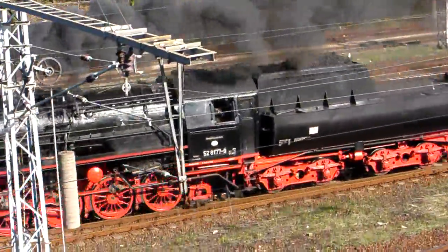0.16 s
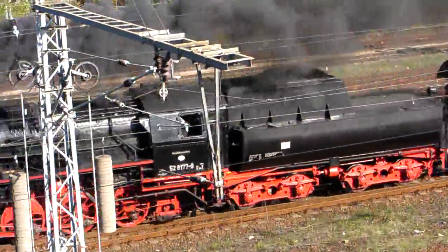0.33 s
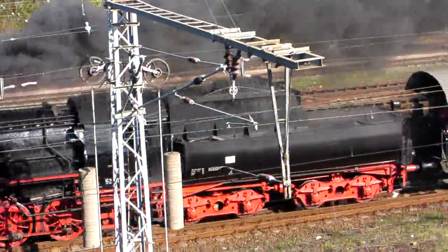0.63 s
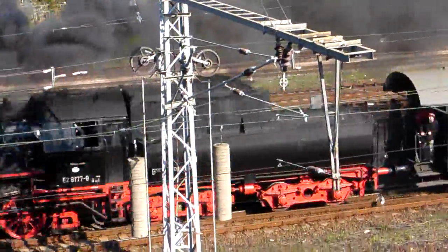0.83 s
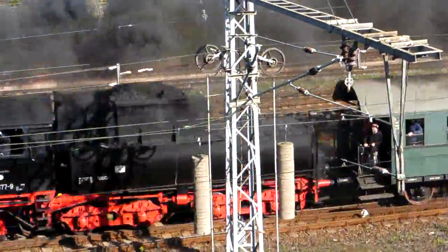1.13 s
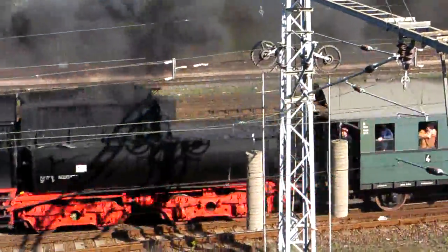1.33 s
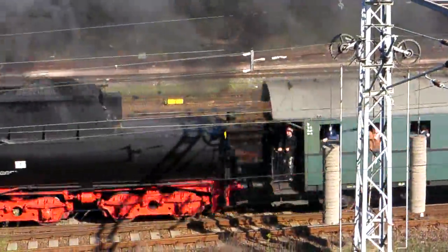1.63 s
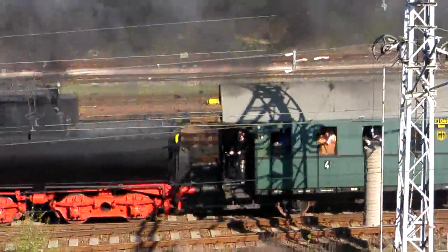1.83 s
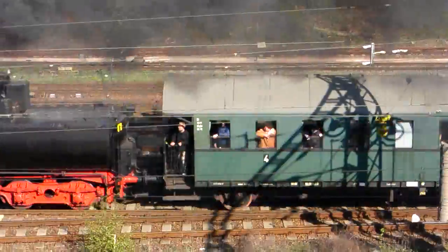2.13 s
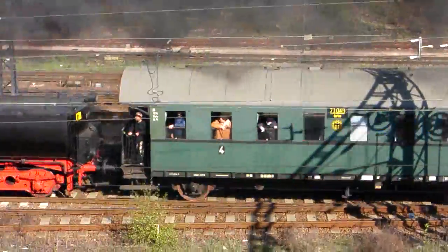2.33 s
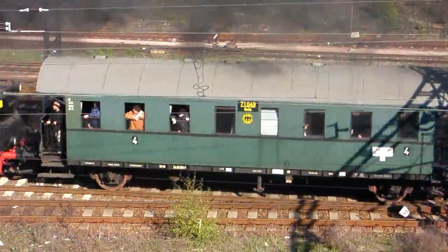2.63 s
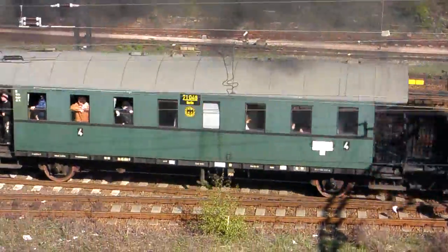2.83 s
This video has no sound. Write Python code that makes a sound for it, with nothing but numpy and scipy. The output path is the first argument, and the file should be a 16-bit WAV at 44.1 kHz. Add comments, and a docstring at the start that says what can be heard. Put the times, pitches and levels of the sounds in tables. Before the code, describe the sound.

Close pass of a steam locomotive and coaches: steady rushing roar, wheel thuds, steel clanks, thinning steam

```python
"""A steam train rolls past just below microphones on a bridge, already close as the sound begins.
Wheels rumble and thud over rail joints, and the running gear and exhaust roar in beats and pops: shaped noise
and damped sines. Rods and couplings clank as noise bursts with beating partials, over fainter clatter.
Leaking steam, a bright noise, spits once early on, leans to the left and fades as the engine draws away.
The microphones drop the deep bass and have a notch near 8 kHz."""
import sys
import numpy as np
from scipy import signal
from scipy.fft import rfft, irfft, next_fast_len
from scipy.io import wavfile
from scipy.ndimage import uniform_filter1d, map_coordinates

SR = 44100
rng = np.random.default_rng(int(sys.argv[2]) if len(sys.argv) > 2 else 0)


def volts_from_db(level):
    """Convert decibel levels to linear amplitude ratios."""
    exponent = np.asarray(level, float) / 20
    return 10 ** exponent


def digitize_waveform(pressure):
    """Quantize a signal to 16-bit integers and store it at the path in sys.argv[1].

    Rows of a 2-D input are taken as channels; values are limited to [-1, 1].
    """
    field = np.atleast_2d(pressure).T
    bounded = np.clip(field, -1, 1)
    quanta = np.round(bounded * 32767).astype(np.int16)
    wavfile.write(sys.argv[1], SR, quanta)


N = 130977
T = np.arange(N) / SR  # seconds


def unit(x):
    """Scaled to rms 1."""
    return x / np.sqrt(np.mean(x ** 2) + 1e-20)


def along(points, hz):
    """(Hz, value) points joined on a log frequency axis."""
    point_hz, value = np.transpose(points)
    return np.interp(np.log(hz + 1), np.log(point_hz + 1), value)


def curves(rows):
    """One value per sample for each column after the time."""
    s, *columns = np.transpose(rows)
    return [np.interp(T, s, column) for column in columns]


def wobble(knots_per_s):
    """A smooth random curve through normally distributed knots."""
    return map_coordinates(rng.standard_normal(400), [T * knots_per_s])


def swells(rows, width_s):
    """The sum of bell-shaped envelopes, one for each (s, dB) row."""
    return sum(volts_from_db(db) * np.exp(-.5 * ((T - s) / width_s) ** 2) for s, db in rows)


def filtered(x, response):
    """x times a response of frequency."""
    m = next_fast_len(N + SR // 2)
    return irfft(rfft(x, m) * response(np.fft.rfftfreq(m, 1 / SR)), m)[..., :N]


def coloured(colour):
    """Mono noise of rms 1 with the given spectrum."""
    return unit(filtered(rng.standard_normal(N), lambda hz: volts_from_db(along(colour, hz))))


# How alike a wide source is at the two microphones. Each row: frequency in Hz, left-right likeness from 0 to 1.
ALIKE = [(60, 1), (300, 1), (1000, 0.99), (2000, 0.94), (4000, 0.81), (7000, 0.36), (10000, 0.56),
         (12400, 0.77)]


def rush(colour, patchy_db, apart=1):
    """Stereo noise, its middle at rms 1, with patches of random gain in time and frequency."""
    spectrum = signal.stft(rng.standard_normal((2, N)), nperseg=512)[2]
    field = rng.standard_normal(spectrum.shape[1:])
    field = uniform_filter1d(uniform_filter1d(field, size=2, axis=0), size=5, axis=1)
    pair = signal.istft(spectrum * volts_from_db(patchy_db * unit(field)), nperseg=512)[1][:, :N]

    def mid_side(hz):
        angle = apart * np.arccos(np.clip(along(ALIKE, hz), -1, 1)) / 2
        return volts_from_db(along(colour, hz)) * [np.cos(angle), np.sin(angle)]

    mid, side = filtered(pair, mid_side)
    return np.array([mid + side, mid - side]) / np.std(mid)


# Wheels rumbling on the rails. Each row: time in seconds, level in dB.
ROLL = [(0, -29), (.12, -23), (.85, -22), (1.05, -21.5), (1.5, -21), (1.7, -21), (2.0, -22.5), (2.4, -21.5),
        (2.97, -19.5)]
# Spectrum of the rumble ahead of the microphones. Each row: frequency in Hz, relative density in dB per Hz.
ROLL_COLOUR = [(20, -52), (55, -27), (80, -16), (115, 1.5), (140, -4.5), (180, 0.5), (250, -0.5),
               (330, -6.5), (450, -16.5), (800, -47)]
# Wheel thuds over rail joints. Each row: centre in seconds, level in dB.
THUDS = [(.38, -22), (.66, -28), (.92, -28), (1.09, -24.5), (1.23, -26), (1.4, -17.5), (1.5, -32),
         (1.76, -25), (1.96, -27.5), (2.09, -25), (2.25, -25), (2.42, -30), (2.7, -23.5), (2.9, -27)]
# Spectrum of the thuds. Each row: frequency in Hz, relative density in dB per Hz.
THUD_COLOUR = [(30, -40), (65, -9), (110, 5.5), (170, 6), (260, -6.5), (450, -37.5)]


def wheels():
    """Low noise for the rumble of wheels and rails, with soft swells of bass noise at the joints."""
    level_db, = curves(ROLL)
    rumble = volts_from_db(level_db + 0.69 * wobble(18.0)) * rush(ROLL_COLOUR, patchy_db=0.3)
    thuds = swells(THUDS, width_s=0.024) * rush(THUD_COLOUR, patchy_db=2.5)
    return rumble + thuds


# Steady roar passing underneath. Each row: time in seconds, level in dB.
ROAR = [(0, -22), (.3, -21), (.9, -20), (1.25, -21.5), (1.6, -19.5), (1.85, -21.5), (2.1, -21), (2.5, -21),
        (2.97, -20.5)]
# Spectrum of the roar ahead of the microphones. Each row: frequency in Hz, relative density in dB per Hz.
ROAR_COLOUR = [(150, -28), (310, -3), (410, -6), (550, 0), (800, -1), (1200, -4), (2000, -6.5),
               (3000, -11.5), (3600, -12), (5000, -19), (7000, -25.5), (10000, -32.5), (12500, -44)]
# Exhaust beats. Each row: centre in seconds, level in dB, swell width in seconds.
CHUFFS = [(.13, -25, 0.016), (.23, -23, 0.025), (.3, -18.5, 0.025), (.44, -27.5, 0.019), (.53, -24, 0.018),
          (.63, -23.5, 0.018), (.75, -22, 0.017), (.85, -25, 0.018), (.905, -21, 0.02), (1.02, -28, 0.016),
          (1.16, -21.5, 0.033), (1.29, -31, 0.014), (1.415, -23, 0.012), (1.49, -23, 0.015),
          (1.58, -28, 0.011), (1.72, -23.5, 0.017), (2.01, -23.5, 0.019), (2.14, -26, 0.018),
          (2.19, -23.5, 0.029), (2.235, -26, 0.013), (2.42, -25, 0.023), (2.5, -24.5, 0.022),
          (2.6, -35, 0.039), (2.72, -31, 0.029), (2.81, -32, 0.038), (2.9, -27, 0.025)]
# Spectrum of the beats. Each row: frequency in Hz, relative density in dB per Hz.
CHUFF_COLOUR = [(250, -41), (500, 0), (850, 2.5), (1300, -3), (2200, -8), (4000, -19.5), (7000, -33)]


def roar():
    """Broad noise of running gear and draught, with rough exhaust beats and dull pops."""
    level_db, = curves(ROAR)
    steady = volts_from_db(level_db + 0.76 * wobble(22.07)) * rush(ROAR_COLOUR, patchy_db=1.35)
    beats = sum(swells([(s, db)], width_s) for s, db, width_s in CHUFFS)
    rough_beats = beats * volts_from_db(1.5 * wobble(80))
    return steady + rough_beats * rush(CHUFF_COLOUR, patchy_db=1.9) + pops()


# Dull pops inside the roar. Each row: start in seconds, level in dB before a common trim, pitch in Hz.
POPS = [(0.211, -15, 842), (0.304, -7, 580), (0.409, -11, 646), (0.434, 0, 840), (0.627, -8, 514),
        (0.741, -12, 845), (0.835, -13, 576), (0.967, 0, 824), (1.146, -4, 824), (1.389, -7, 713),
        (1.409, -8, 692), (1.49, -2.5, 615), (1.575, -6, 444), (2.015, -3, 795), (2.082, -8, 680),
        (2.137, -15, 923), (2.228, -10, 700), (2.623, -4, 861), (2.68, -1.5, 700), (2.828, -3, 740),
        (2.867, -6, 490), (2.898, -13, 627)]
POP_CYCLES, POP_TRIM_DB = 2.9, -2  # cycles to fall 20 dB; trim of all pops


def pops():
    """Sines so heavily damped that each lasts only a few cycles."""
    out, t = np.zeros(N + SR), T[:SR // 20]
    for s, db, hz in POPS:
        decay = volts_from_db(db + POP_TRIM_DB - 20 * hz * t / POP_CYCLES)
        rise = 1 - np.exp(-2 * hz * t)
        out[round(s * SR):][:len(t)] += decay * rise * np.sin(2 * np.pi * hz * t)
    return out[:N]


# Hollow tone of the chimney. Each row: frequency in Hz, relative density in dB per Hz.
BLAST_COLOUR = [(600, -20), (780, -4), (860, 2.5), (960, -6.5), (1300, -6.5), (2500, -12.5), (4700, -16.5),
                (6500, -25.5), (9000, -50)]
BLAST_DB, BLAST_FADE_DB_PER_S, BLAST_GRAIN_DB = -27, 5, 1.8  # first level, fade, random flutter


def blast():
    """Chimney noise with a hollow tone and coarse hiss, sinking steadily as it recedes."""
    level_db = BLAST_DB - BLAST_FADE_DB_PER_S * T + BLAST_GRAIN_DB * wobble(65)
    return volts_from_db(level_db) * rush(BLAST_COLOUR, patchy_db=1.5)


# Steel clanks of rods and couplings.
# Each row: start in seconds, knock level in dB, ring pitch at the start in Hz, level of the ring's middle partial in dB.
CLANKS = [(.056, -32, 3460, -34), (0.242, -18, 2520, -24), (.61, -17.5, 5290, -34), (.756, -20, 4900, -29),
          (0.873, -18, 5290, -33), (.982, -21, 3750, -28), (1.01, -20, 5290, -32), (1.17, -21, 2600, -23),
          (1.262, -34, 5290, -30), (1.279, -25, 2590, -20), (1.277, -30, 3720, -17),
          (1.406, -21, 5340, -24), (1.575, -19.5, 3300, -26), (1.735, -21, 5250, -33),
          (1.997, -18.5, 5290, -30), (2.09, -38, 5300, -33), (2.17, -26, 2960, -26),
          (2.396, -32, 2620, -28), (2.55, -35, 5240, -33), (2.7, -20.5, 5290, -34), (2.92, -36, 2810, -30)]
# Spectrum of the knocks. Each row: frequency in Hz, relative density in dB per Hz.
KNOCK_COLOUR = [(300, -37), (1000, -1), (2500, 2.5), (5000, -3), (9000, -16), (12000, -21)]
KNOCK_T60_S, RING_T60_S, RISE_S = .12, 0.096, 0.0075  # the rise serves both knock and ring
RING_BEAT = 0.007  # least spacing of a ring's three partials, share of pitch
RING_SAG_PER_S = 0.35  # share of pitch lost per second


def clanks():
    """Each clank: a dying burst of noise and a rough, sagging ring of three close partials."""
    knock, ring = np.zeros(N + SR), np.zeros(N + SR)
    t = T[:SR // 4]
    rise = 1 - np.exp(-t / RISE_S)
    bent = t * (1 - RING_SAG_PER_S * t / 2)  # time slowed so that the pitch falls
    for s, knock_db, hz, ring_db in CLANKS:
        partials = np.sin(2 * np.pi * hz * bent)
        for k in (-1, 1):
            side_hz = hz * (1 + k * RING_BEAT * rng.uniform(1.0, 1.6))
            partials = partials + 0.84 * np.sin(2 * np.pi * (side_hz * bent + rng.random()))
        start = round(s * SR)
        knock[start:][:len(t)] += volts_from_db(knock_db - 60 * t / KNOCK_T60_S) * rise
        ring[start:][:len(t)] += volts_from_db(ring_db - 60 * t / RING_T60_S) * rise * partials
    return knock[:N] * rush(KNOCK_COLOUR, patchy_db=3.5) + ring[:N]


# Spectrum of the spit of steam. Each row: frequency in Hz, relative density in dB per Hz.
SPIT_COLOUR = [(3000, -30), (4800, -6), (5700, 4), (6800, 0), (8500, -17), (10800, -6), (12500, -20)]
SPIT_S, SPIT_DB, SPIT_RISE_S, SPIT_T60_S = .375, -20.5, .004, 0.072


def spit():
    """One short spit of steam: treble noise with a quick rise and decay."""
    t = np.clip(T - SPIT_S, 0, None)
    envelope = volts_from_db(SPIT_DB - 60 * t / SPIT_T60_S) * (1 - np.exp(-t / SPIT_RISE_S))
    return envelope * rush(SPIT_COLOUR, patchy_db=2.5)


# Leaking steam. Each row: time in seconds, level of its top band in dB, left over right in dB.
STEAM = [(0.0, -35, 1.5), (0.02, -41, 1), (0.37, -38.5, 1.5), (0.39, -35, 4), (0.4, -38, 2.0),
         (0.45, -41.5, 3), (0.57, -34.5, 1), (0.59, -40, 5), (0.99, -41, 7), (1.06, -38, 8),
         (1.39, -45.5, 11), (1.42, -43, 7), (1.46, -47.5, 8), (1.64, -37.5, 8), (1.68, -44, 4),
         (1.75, -42.5, 8), (1.87, -48.5, 10), (2.04, -38, 6), (2.08, -50.5, 15), (2.25, -44, 10),
         (2.26, -51, 7), (2.35, -46, 11), (2.54, -50, 7), (2.78, -47, 4), (2.81, -54.5, 0.5),
         (2.97, -60.5, 1.0)]
# Spectrum of the hiss ahead of the microphones. Each row: frequency in Hz, relative density in dB per Hz.
STEAM_COLOUR = [(1500, -32), (3500, 8), (6000, 3), (9000, 3), (10800, 5.5), (11800, 0.5), (12600, 3),
                (14000, 1.5)]
STEAM_DB = 4  # whole hiss over its top band


def steam():
    """Fluttering bright noise whose direction drifts as the engine moves."""
    level_db, pan_db = curves(STEAM)
    level_db = STEAM_DB + level_db + 0.86 * wobble(24.53)
    hiss = volts_from_db(level_db) * rush(STEAM_COLOUR, patchy_db=2.5, apart=0.77)
    return hiss * volts_from_db(np.array([pan_db, -pan_db]) / 2)


def clatter():
    """Short knocks of wheels and rods, and longer rings of loose steel parts, both as damped sines."""
    knocks = rings(420, centre_hz=1510, octaves=1.2, cycles=7.9, level_db=-32, spread_db=2.5)
    jingle = rings(500, centre_hz=2513, octaves=1.1, cycles=77, level_db=-37, spread_db=0.73)
    return knocks + jingle


def rings(count, centre_hz, octaves, cycles, level_db, spread_db):
    """Sines at random times and pitches that fall 20 dB in the given cycles; higher ones are weaker."""
    when = rng.random((count, 1))
    hz = np.clip(centre_hz * 2 ** (octaves * rng.standard_normal(when.shape)), 100, 12000)
    size = volts_from_db(level_db + spread_db * rng.exponential(size=when.shape)) * centre_hz / hz
    k = np.arange(3000)  # samples since the start of each ring
    life = hz * k / SR / cycles
    envelope = 10 ** -life * (1 - np.exp(-life * 20))
    fade = np.hanning(2 * len(k))[len(k):]
    ring = size * np.sin(2 * np.pi * hz * k / SR) * envelope * fade
    return np.bincount(((when * N).astype(int) + k).ravel(), ring.ravel())[:N]


# Moments at which the stereo image widens. Each row: centre in seconds, side level in dB.
WIDENS = [(.065, -32), (.22, -31), (.455, -34), (.675, -30), (.8, -34), (.875, -28.5), (1.078, -28),
          (1.135, -37), (1.31, -33), (1.62, -32), (1.71, -30), (1.815, -31), (2.04, -30), (2.163, -31),
          (2.313, -32), (2.405, -34), (2.53, -35), (2.58, -37), (2.715, -35), (2.89, -33)]
# Spectrum of these puffs. Each row: frequency in Hz, relative density in dB per Hz.
WIDEN_COLOUR = [(60, -28), (150, -3), (300, -5), (500, -11), (1000, -5), (2000, -12), (4000, -19),
                (8000, -50)]


def widening():
    """Brief low puffs of noise, of opposite sign in the two channels."""
    return swells(WIDENS, width_s=0.012) * coloured(WIDEN_COLOUR) * [[1], [-1]]


# Balance of the train at the two microphones. Each row: frequency in Hz, left over right in dB.
LEAN = [(60, 2), (400, 1.5), (1200, 1), (2500, 0), (7000, -1.5)]


def scene():
    """All sources; the low range of the train leans to the left."""
    train = wheels() + roar() + clanks() + clatter() + spit() + blast()
    leaning = filtered(train, lambda hz: volts_from_db(np.outer([.5, -.5], along(LEAN, hz))))
    return leaning + steam() + widening()


BASS_CUT_HZ, TOP_HZ = 23, 12750
NOTCH_HZ, NOTCH_WIDTH_HZ, CORE_WIDTH_HZ = 7860, 2600, 730


def microphone(hz):
    """Bass cut, a wide treble notch with a deep core, and band limit."""
    off = np.abs(NOTCH_HZ ** 2 - hz ** 2)
    wide = off / np.hypot(off, hz * NOTCH_WIDTH_HZ)
    core = off / np.hypot(off, hz * CORE_WIDTH_HZ)
    bass_cut = hz ** 2 / (hz ** 2 + BASS_CUT_HZ ** 2)
    return wide * core * bass_cut * (hz < TOP_HZ)


EDGE_HZ = 12060  # lower edge of the gated band
GATE_DB, GATE_S = -53.6, .045  # threshold and averaging time


def gate(x):
    """Mutes the topmost band while its short-time power is faint."""
    top = filtered(x, lambda hz: hz > EDGE_HZ)
    span = round(GATE_S * SR)
    shut = uniform_filter1d(top.mean(axis=0) ** 2, span) < volts_from_db(2 * GATE_DB)
    return x - top * uniform_filter1d(shut.astype(float), span // 4)


def band_limit(x):
    """A steep low-pass at the top of the band."""
    return signal.sosfilt(signal.butter(12, 13710, fs=SR, output="sos"), x)


def record(dry):
    """Microphones, then the gate on the topmost band and the band limit."""
    heard = gate(filtered(dry, microphone))
    mix = filtered(heard, lambda hz: hz < TOP_HZ)
    return band_limit(mix)


dry = scene()
out = record(dry)
digitize_waveform(out)
```